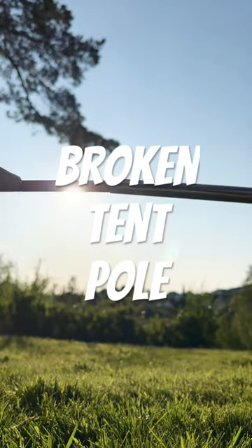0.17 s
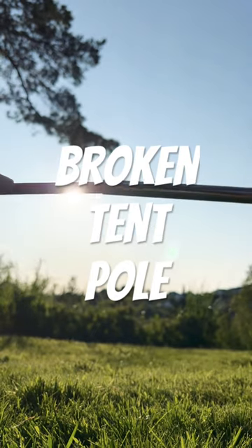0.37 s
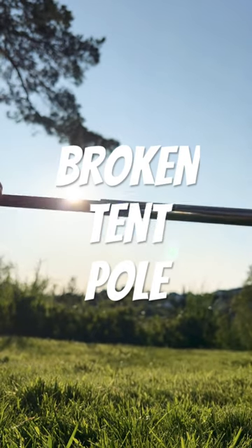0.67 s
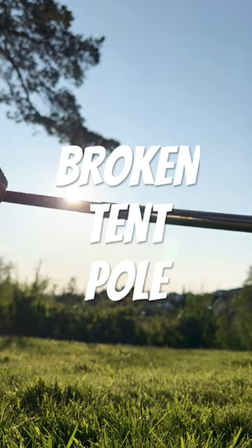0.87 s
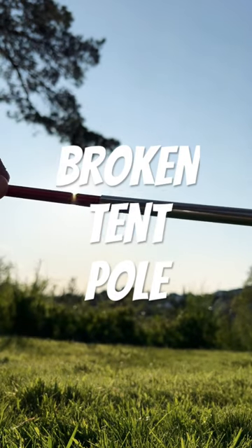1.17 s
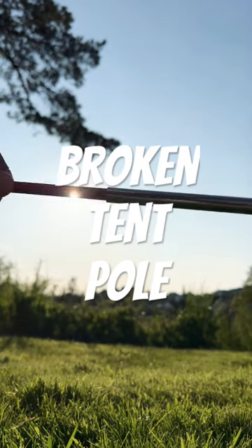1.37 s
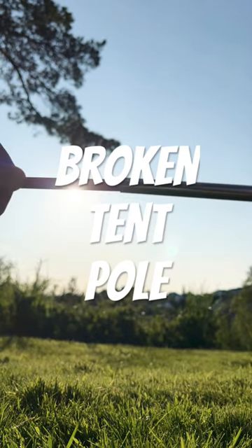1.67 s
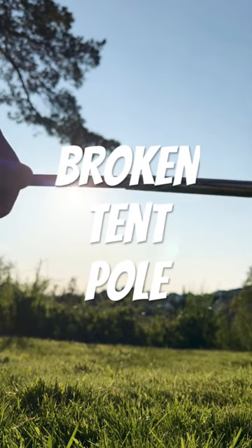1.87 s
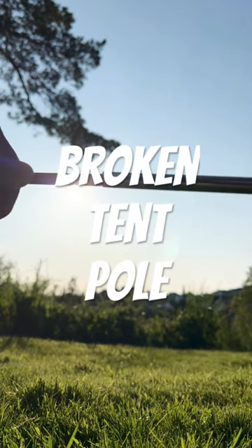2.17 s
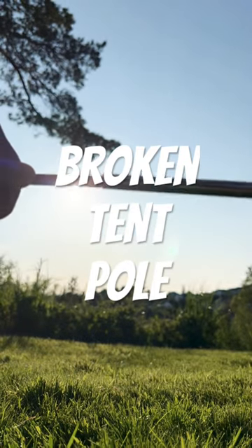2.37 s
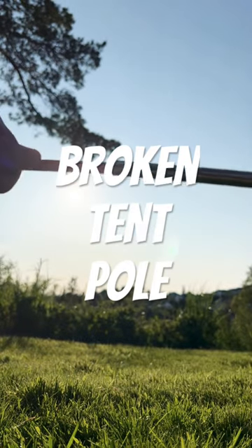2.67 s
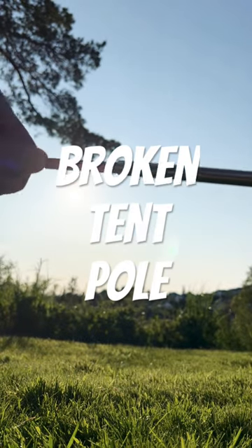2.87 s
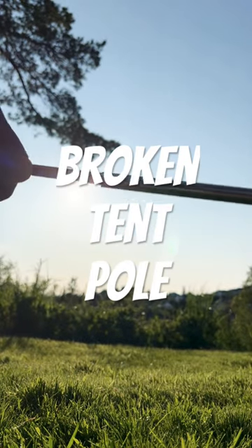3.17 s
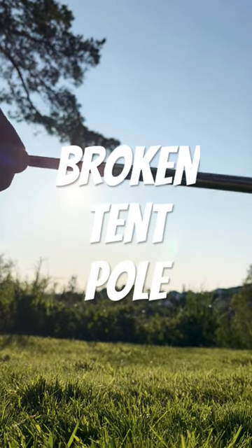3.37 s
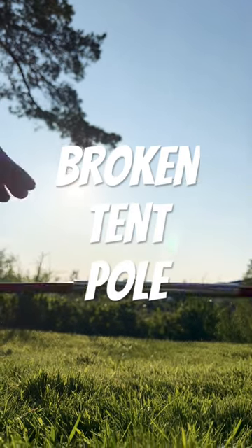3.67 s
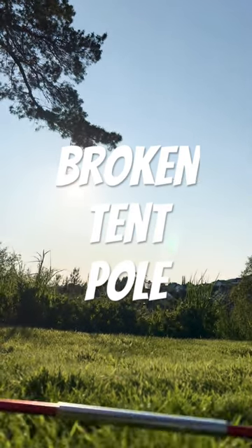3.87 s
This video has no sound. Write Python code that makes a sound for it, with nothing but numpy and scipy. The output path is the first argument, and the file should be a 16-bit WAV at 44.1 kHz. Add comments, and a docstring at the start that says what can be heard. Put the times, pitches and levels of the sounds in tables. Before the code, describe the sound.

Metal pole pieces snap and slide sharply up close, ending in a loud clack and rattle

```python
"""Tent poles over a lawn

Close to two microphones, hands work two thin metal pole sections that click, chatter and slide, then drop
into the grass. Contacts ring the wall and the hollow tube; rubbing is gritty hiss; dull knocks ring briefly.
Light wind buffets the microphones as low noise, a small distant bird chirps in falling whistles,
and far traffic drones as smooth noise."""
import sys
import numpy as np
from scipy import signal
from scipy.fft import rfft, irfft
from scipy.io import wavfile

SR = 44100
rng = np.random.default_rng(int(sys.argv[2]) if len(sys.argv) > 2 else 0)


def boost(x):
    """Linear amplitude factor 10**(x/20) for a level x in decibels (scalar or array-like)."""
    u = np.asarray(x, float) / 20
    return 10 ** u


def output_pcm(signal):
    """Save a mono or channel-first signal as 16-bit PCM at the path in sys.argv[1].

    Samples are clipped to [-1, 1] before scaling.
    """
    pcm = np.clip(np.atleast_2d(signal).T, -1, 1) * 32767
    wavfile.write(sys.argv[1], SR, np.round(pcm).astype(np.int16))


N = 176400   # samples, 4 s

# metal contacts: (time [s], level [dB], hardness as treble tilt [dB per octave],
# tube ring before TUBE_RING_DB [dB], chatter decay [ms])
CONTACTS = [(0.552, -20, 2.5, -16.5, 2.56), (0.598, -39, -3, -16.5, 3.3), (0.632, -47.5, -6, -20, 2.7),
            (0.986, -47.5, -2, -41.5, 1.3), (1.3984, -36, 4, -17.5, 2), (1.4036, -21, 1, -42, 1.7),
            (1.4152, -11.5, -2, -37, 2.2), (1.4168, -13, 3.5, -14.5, 1.54), (1.4356, -35.5, -1, -30, 0.94),
            (1.4455, -30, -4, -30, 2.6), (1.4486, -4, 0.5, -25, 1.6), (1.543, -66, -7, -16, 1.5),
            (1.5807, -18.5, 2, -15.5, 2.25), (1.5862, -36.5, 3.5, 3.5, 1.6), (1.8048, -47, 2.5, -28.5, 3.6),
            (2.0391, -43, -4.5, -21, 2.1), (2.2818, -50, -1, -24, 3), (2.316, -34.5, 0, -25, 2.44),
            (2.7204, -62, -3, -4.5, 2.3), (2.762, -64.5, -1.5, -1, 2.3), (2.7919, -49, -3, -6.5, 1.56),
            (2.8536, -45, -4, -30, 3.2), (2.855, -49, -7, -11, 3.2), (2.8797, -44.5, -3.5, -19.5, 4.2),
            (2.9483, -57, 4, -28, 1.4), (2.9999, -22.5, -3.5, -31, 0.36), (3.005, -42, -19, -12.5, 1.9),
            (3.1325, -56.5, -6, -17, 2.3), (3.177, -49.5, -5.5, -12, 1.2),
            (3.1815, -42.5, -3.3, -20.5, 1.15), (3.482, -52, 3, -17.5, 1.6), (3.494, -47, 1.5, -34, 2.3),
            (3.6132, -63.5, -11, -5, 1.55), (3.703, -37, 1.5, -28.5, 3), (3.7241, 1, 12.5, -32.5, 0.8),
            (3.7606, -28.5, 7, -11, 1.4), (3.7792, -23, -4, -36, 1.2), (3.784, -26, 5, -26, 2.1),
            (3.7905, -23, 2, -45, 0.54), (3.803, -32, -1, -16, 1.9), (3.8123, -35, 8, -12, 2.4),
            (3.8284, -28, 1, -41, 2), (3.8404, -35.5, -3, -33, 2.9), (3.8732, -36.5, 3, -15, 1.5),
            (3.8972, -31, 5, -26.5, 2.8), (3.9547, -46, -6, -10, 1.6), (3.967, -53, -2.5, -6, 5.4)]
# pole wall modes before their spread and the grip: (frequency [Hz], level [dB], 60 dB decay [s])
WALL_MODES = [(3442, -6, 0.051), (4173, -5, 0.018), (4460, -23.5, 0.069), (6048, -1.5, 0.028),
              (6820, -2, 0.0091), (7600, 2.5, 0.0069), (8790, -9.5, 0.0092), (8774, 4, 0.0035)]
# colour of the crack at each touch: (frequency [Hz], relative level [dB])
CRACK_COLOUR = [(710, -41), (1200, -16), (2170, -14), (4620, -1.5), (6290, -2), (10100, 2), (10900, -10.5),
                (11900, -13), (15100, -10), (16500, -18.5)]
# hollow tube resonances: (pitch ratio [1], share of the ring time [1])
TUBE_MODES = [(.88, .45), (1, 1), (1.08, .6)]
# tube pitch, moving as the sections slide: (time [s], frequency [Hz])
TUBE_PITCH = [(0.6, 2600), (1.42, 2020), (1.445, 2400), (1.58, 2520), (2.9, 2550), (3.2, 2150),
              (3.75, 3050)]
# strokes of metal, fingers and grass rubbing: (time [s], length [s], bright level [dB], dull level [dB])
STROKES = [(0.493, 0.077, -71, -71), (0.565, 0.072, -60, -61), (0.625, 0.073, -73.5, -73),
           (0.98, 0.052, -103, -82.5), (1.316, 0.098, -91.5, -95), (1.397, 0.05, -92, -53.5),
           (1.445, 0.23, -77, -72.5), (1.588, 0.092, -71, -85), (1.657, 0.071, -77, -105),
           (1.731, 0.065, -63.5, -81), (1.78, 0.07, -84, -80), (1.877, .11, -72, -76.5),
           (2.025, 0.14, -63.5, -69), (2.193, 0.045, -79, -74.5), (2.273, 0.065, -76.5, -84.5),
           (2.308, 0.095, -81.5, -80.5), (2.711, 0.16, -93.5, -76.5), (2.851, 0.013, -61, -56),
           (2.871, 0.012, -59, -58), (2.879, 0.089, -72, -75.5), (2.991, 0.12, -87.5, -77),
           (3.079, 0.15, -97.5, -81), (3.418, 0.047, -77, -87), (3.463, 0.068, -72, -77.5),
           (3.53, 0.15, -89.5, -84.5), (3.671, 0.052, -67, -62), (3.719, 0.035, -45, -38),
           (3.737, 0.074, -46, -46.5), (3.805, 0.051, -56, -56), (3.844, 0.064, -67, -63),
           (3.887, 0.06, -63, -61.5), (3.949, 0.048, -61, -55)]
# colour of the bright rubbing: (frequency [Hz], relative level [dB])
BRIGHT_COLOUR = [(2350, -39.5), (4000, -30), (5440, -4), (5920, 3), (10200, -3.5), (11800, -22),
                 (15200, -11.5), (16200, -11.5), (16500, -64)]
# colour of the dull rubbing: (frequency [Hz], relative level [dB])
DULL_COLOUR = [(530, -32.5), (900, -4.5), (1500, -8.5), (2260, -6.5), (3240, -9.5), (4500, -9), (5850, -22),
               (9900, -120)]
# dull knocks against hand and turf: (time [s], level [dB], frequency [Hz])
KNOCKS = [(1.5811, -45, 980), (3.741, -33, 190.2), (3.7352, -29, 555), (3.7356, -22.5, 1440),
          (3.957, -34.5, 171.5), (3.965, -39, 160)]
# near sounds, left microphone ahead of right: (frequency [Hz], phase [rad])
NEAR_LEAD = [(250, 0.1), (600, -0.98), (1200, -1.1), (2500, -0.31), (4500, -1.7), (5600, -1.2),
             (11000, -1.3), (16000, -1.4)]
# wind puffs on the microphones: (time [s], length [s], level [dB])
GUSTS = [(.0, 0.18, -50), (0.222, 0.11, -45.5), (0.414, 0.24, -59), (0.648, 0.047, -61), (1.438, 0.19, -64),
         (1.715, 0.26, -60), (1.886, 0.24, -61.5), (2.09, 0.33, -57), (2.349, 0.098, -53),
         (2.464, 0.096, -54), (2.559, 0.18, -53.5), (2.794, 0.27, -52), (3.028, 0.097, -63.5),
         (3.136, 0.16, -50.5), (3.339, 0.17, -46.5), (3.488, 0.18, -59.5), (3.629, 0.053, -43),
         (3.69, .12, -39.5), (3.8, 0.13, -50), (3.909, 0.11, -47.5)]
# colour of the buffeting: (frequency [Hz], relative level [dB])
WIND_COLOUR = [(12, -41), (25, -20.5), (47, 0), (70, -3), (126, -6), (150, -12), (255, -16), (315, -37),
               (400, -19.5), (520, -47.5), (880, -120)]
# bird notes before burr and echo: (time [s], length [s], start [Hz], end [Hz], level [dB])
CHIRPS = [(0, 0.075, 3720, 3540, -78.5), (0.079, 0.09, 3460, 3100, -85.5), (0.415, 0.046, 4020, 3400, -74),
          (0.457, 0.04, 3326, 2750, -76.5), (2.349, 0.041, 4000, 3405, -73.5),
          (2.386, 0.052, 3050, 2416, -76.5), (2.49, 0.05, 4200, 3570, -83.5),
          (3.274, 0.018, 3550, 3380, -76.5), (3.298, 0.038, 3880, 3365, -64.5),
          (3.303, 0.027, 4150, 3850, -75.5), (3.349, 0.03, 3450, 2945, -71),
          (3.35, 0.041, 3120, 2550, -73.5)]
# far traffic before its drift: (time [s], level [dB])
DRONE = [(0.0, -59), (1.21, -60.5), (1.7, -56.5), (2.91, -59), (4.0, -53)]
# colour of the far traffic: (frequency [Hz], relative level [dB])
TRAFFIC_COLOUR = [(15, -60), (30, -22.5), (170, -2.5), (200, 2), (270, -4.5), (344, -6), (384, -5),
                  (463, -4), (503, -4), (575, -5.5), (734, -5), (911, -5.5), (2000, -33), (2410, -37),
                  (16000, -54.5)]
# far traffic at the two microphones: (frequency [Hz], left-right likeness [1])
LIKENESS = [(60, 0.96), (130, 0.96), (290, 0.92), (640, 0.3), (1410, 0.025), (3100, 1), (6820, 0.32),
            (15000, 0.026)]

TOUCHES_PER_S, TOUCH_SPREAD_DB, CHATTER_DB = 6000, 2.5, -14.5
WALL_RING_DB, MODE_SPREAD_DB, DETUNE = -15, 3.5, .05   # DETUNE: spread as a share of the mode's pitch
GRIP_T60_S = .011   # the hand damps longer rings
TUBE_RING_DB, TUBE_RING_S = -2.0, .036
THIN_HZ = 1450   # the slim pole radiates little below this
AIR_RUSTLE_DB, RUB_SIDE_DB = -89.5, -9.5
STROKE_EDGE = .24   # edge length as a share of a stroke
GRIT_PER_S, GRIT_SPREAD_DB, GRIT_DB = 2200, 3.0, -2.5
PATCH_OCTAVES, UNEVEN_DB = .5, 3.0   # each such band of the rubbing wavers on its own
THUD_CYCLES = 8   # cycles to decay by 60 dB
NEAR_PAN_DB = 0.5   # left over right
CALM_DB, WIND_SIDE = -77.5, .04   # wind between puffs; left-right difference as a ratio
PUFF_EDGE = .45   # edge length as a share of a puff
BURR, BURR_AT_HZ_PER_S, BURR_HZ = 1.3, 15000, 240   # the faster the fall, the rougher
BIRD_ECHO_S, BIRD_ECHO_DB = .22, -1


def clicks(size=2600):
    """Each contact is a first touch and a dying chatter; it cracks, rings the wall and the hollow tube."""
    out, t = np.zeros(N + size), np.arange(size) / SR
    crack = causal(CRACK_COLOUR)
    for s, db, tilt_db, tube_db, ms in CONTACTS:
        hardness = causal([(1750, -2 * tilt_db), (7000, 0), (14000, tilt_db)], size=256)
        touches = chatter(t, ms)
        snap = signal.fftconvolve(touches, crack)[:size] + boost(WALL_RING_DB) * wall_ring(touches)
        tube = tube_ring(touches, np.interp(s, *np.transpose(TUBE_PITCH)))
        sound = signal.fftconvolve(snap, hardness)[:size] + boost(TUBE_RING_DB + tube_db) * tube
        start = int(s * SR)
        out[start:start + size] += boost(db) * sound
    thin = signal.butter(4, THIN_HZ, "high", fs=SR, output="sos")
    return signal.sosfilt(thin, out[:N] + 1e-18)


def chatter(t, ms):
    """A first touch, then random bounces of either sign that die away exponentially."""
    size = len(t)
    hits = (rng.random(size) < TOUCHES_PER_S / SR) * rng.choice([-1, 1], size)
    touches = hits * boost(TOUCH_SPREAD_DB * rng.standard_normal(size) + CHATTER_DB) * ms
    touches[0] = 1 / max(ms, 1)   # a long chatter starts gently
    return touches * np.exp(-np.minimum(t * 1000 / max(ms, .1), 40))


def wall_ring(touches):
    """The thin metal wall rings in modes whose pitch and level vary by contact, damped by the hand."""
    luck = rng.standard_normal((len(WALL_MODES), 2))
    wall = 0
    for (hz, level, t60), (louder, sharper) in zip(WALL_MODES, luck):
        mode_hz = min(hz * (1 + DETUNE * sharper), SR / 2.2)
        wall = wall + boost(level + MODE_SPREAD_DB * louder) * ring(touches, mode_hz, min(t60, GRIP_T60_S))
    return wall


def tube_ring(touches, hz):
    """The hollow tube answers the touches with a few resonances close in pitch."""
    return sum(ring(touches, hz * ratio, TUBE_RING_S * last) for ratio, last in TUBE_MODES)


def rubbing():
    """Fine hiss of sliding surfaces with grit in it, a bright and a duller part; rows: mid, side."""
    bright = dull = boost(AIR_RUSTLE_DB)
    for s, length, bright_db, dull_db in STROKES:
        shape = swell(s, length, STROKE_EDGE * length)
        bright = bright + boost(bright_db) * shape
        dull = dull + boost(dull_db) * shape
    return [bright * grain(BRIGHT_COLOUR) + dull * grain(DULL_COLOUR) for _ in range(2)]


def grain(spectrum):
    """Noise in bands that waver separately, with sparse grit, in the given colour."""
    hits = (rng.random(N) < GRIT_PER_S / SR) * rng.standard_normal(N)
    grit = hits * boost(GRIT_SPREAD_DB * rng.standard_normal(N))
    octave = np.log2(np.fft.rfftfreq(N, 1 / SR) + 1) - 10   # above about 1 kHz
    band = np.maximum(octave, 0) // PATCH_OCTAVES
    white = rfft(rng.standard_normal(N))
    hiss = sum(irfft(white * (band == k), N) * boost(UNEVEN_DB * drift(30.)) for k in np.unique(band))
    return rms_one(colour(hiss + boost(GRIT_DB) * rms_one(grit), spectrum))


def thuds():
    """Soft pushes against hand and turf ring a few cycles."""
    out = np.zeros(N)
    for s, db, hz in KNOCKS:
        push = np.zeros(N)
        push[int(s * SR)] = boost(db)
        out += ring(push, hz, THUD_CYCLES / hz)
    return out


def near_pair(x):
    """Two close microphones: a phase lead that depends on pitch, and a slight level difference."""
    lead = at_hz(NEAR_LEAD, np.fft.rfftfreq(N, 1 / SR))
    turn = np.exp(.5j * lead * [[1], [-1]])
    return irfft(rfft(x) * turn, N) * boost(np.array([[.5], [-.5]]) * NEAR_PAN_DB)


def wind():
    """Lumpy low buffeting, almost the same on both microphones."""
    mid, side = (rms_one(colour(rng.standard_normal(N), WIND_COLOUR)) for _ in range(2))
    puffs = sum(boost(db) * swell(s, length, PUFF_EDGE * length) for s, length, db in GUSTS)
    return (boost(CALM_DB) + puffs) * (mid + WIND_SIDE * side * [[1], [-1]])


def bird():
    """Distant falling whistled notes with a burr, and a blurred echo from the trees."""
    out = np.zeros(N + SR)
    burr = np.append(drift(BURR_HZ), np.zeros(SR))
    for s, length, start_hz, end_hz, db in CHIRPS:
        u = np.linspace(0, 1, int(length * SR))
        pitch = start_hz + (end_hz - start_hz) * u ** 1.2
        whistle = np.sin(2 * np.pi * np.cumsum(pitch) / SR)
        shape = boost(db) * np.abs(np.sin(np.pi * u)) ** 0.34
        note = slice(int(s * SR), int(s * SR) + len(u))
        rough = BURR * (start_hz - end_hz) / length / BURR_AT_HZ_PER_S
        out[note] += (1 + rough * burr[note]) * shape * whistle
    out = out[:N]
    tail = np.arange(SR // 4) / SR
    echoes = rng.standard_normal((2, len(tail))) * boost(-60 * tail / BIRD_ECHO_S)
    echoes *= boost(BIRD_ECHO_DB) / np.sqrt(np.sum(echoes ** 2, axis=1, keepdims=True))
    return out + signal.fftconvolve(out[None], echoes)[:, :N]


def traffic():
    """Smooth far drone; how alike the microphones hear it depends on pitch."""
    alike = np.clip(at_hz(LIKENESS, np.fft.rfftfreq(N, 1 / SR)), -1, 1)
    mid, side = (rfft(colour(rng.standard_normal(N), TRAFFIC_COLOUR)) for _ in range(2))
    both = irfft(np.sqrt(1 + alike) * mid + np.sqrt(1 - alike) * side * [[1], [-1]], N)
    return boost(in_time(DRONE)[0] + 0.96 * drift(5.8)) * rms_one(both)


def ring(hits, hz, t60):
    """A two-pole resonator: a unit hit sets a decaying sine of height 1 ringing."""
    r = boost(-60 / (abs(t60) * SR + 1))
    w = 2 * np.pi * hz / SR
    return signal.lfilter([0, np.sin(w)], [1, -2 * r * np.cos(w), r * r], hits + 1e-18)


def causal(spectrum, size=1024):
    """Shortest causal (minimum-phase) impulse with this spectrum, peak 1."""
    cepstrum = irfft(np.log(boost(at_hz(spectrum, np.fft.rfftfreq(size, 1 / SR)))))
    cepstrum[1:size // 2] *= 2   # fold negative time onto positive
    cepstrum[size // 2 + 1:] = 0
    h = irfft(np.exp(rfft(cepstrum)))[:size // 2]
    return h / np.abs(h).max()


def colour(x, spectrum):
    """Steady sound shaped to a spectrum."""
    return irfft(rfft(x) * boost(at_hz(spectrum, np.fft.rfftfreq(N, 1 / SR))), N)


def swell(s, length, edge_s):
    """Level 1 around the given length, with rounded edges centred near its ends."""
    top_end = max(length - edge_s, edge_s)
    end = max(length, 2 * edge_s) + edge_s
    corners = s + np.array([-edge_s, edge_s, top_end, end])
    return np.interp(np.arange(N) / SR, corners, [0, 1, 1, 0]) ** 2


def drift(rate):
    """Slow chance with spread 1: noise through two equal low-pass poles at the rate in Hz."""
    r = np.exp(-80 * np.pi * rate / SR)   # computed at every 40th sample
    slow = signal.lfilter([1], [1, -2 * r, r * r], rng.standard_normal(N // 40 + 2002))
    slow = rms_one(slow[2000:])   # past the filter's start
    return np.interp(np.arange(N) / 40, np.arange(len(slow)), slow)


def rms_one(x):
    """Scales a sound to unit rms."""
    return x / np.sqrt(np.mean(x ** 2) + 1e-20)


def in_time(rows):
    """Joins timed rows with straight lines, one curve per column."""
    s, *columns = np.transpose(rows)
    return [np.interp(np.arange(N) / SR, s, c) for c in columns]


def at_hz(points, hz):
    """Reads a curve over frequency, straight on a logarithmic pitch axis."""
    point_hz, value = np.array(points).T
    return np.interp(np.log(np.maximum(hz, 1)), np.log(point_hz), value)


def scene():
    """The poles close to the microphones, with wind, far traffic and the bird around them."""
    rub, scatter = rubbing()
    near = near_pair(clicks() + rub + thuds())
    rub_width = boost(RUB_SIDE_DB) * scatter * [[1], [-1]]
    return near + rub_width + wind() + traffic() + bird()


def top_cut(x):
    """Nothing passes above the cut-off."""
    return signal.sosfilt(signal.butter(12, 16820, fs=SR, output="sos"), x)


def record(dry):
    """A steep low-pass cuts the top, 70 dB down from 17.2 kHz."""
    low_pass = signal.cheby2(12, 70, 17200, fs=SR, output="sos")
    mix = signal.sosfilt(low_pass, dry)
    return top_cut(mix)


dry = scene()
out = record(dry)
output_pcm(out)
```